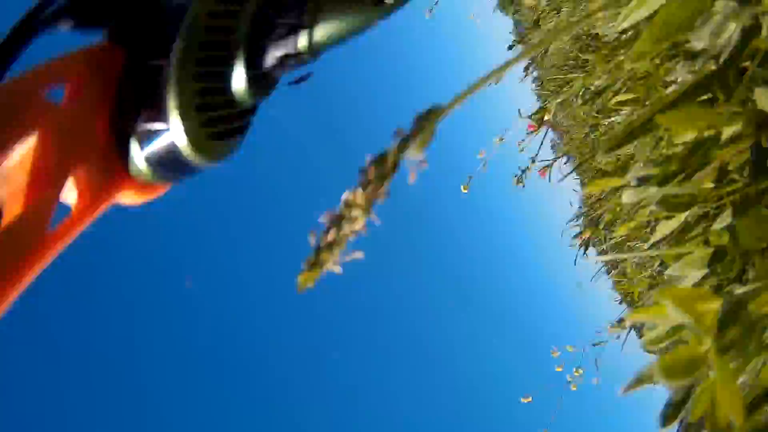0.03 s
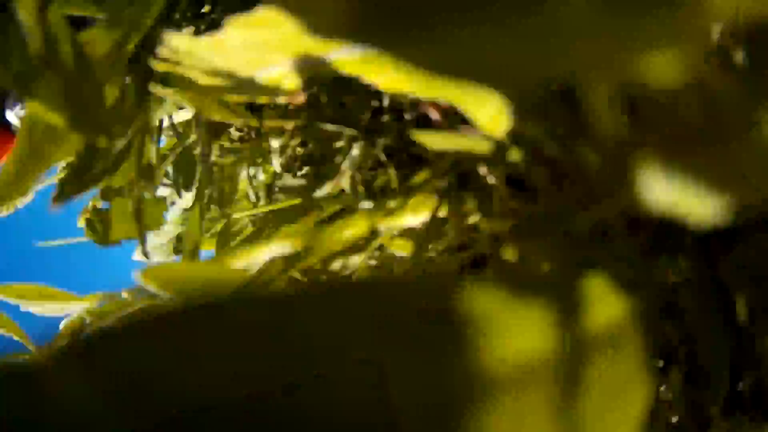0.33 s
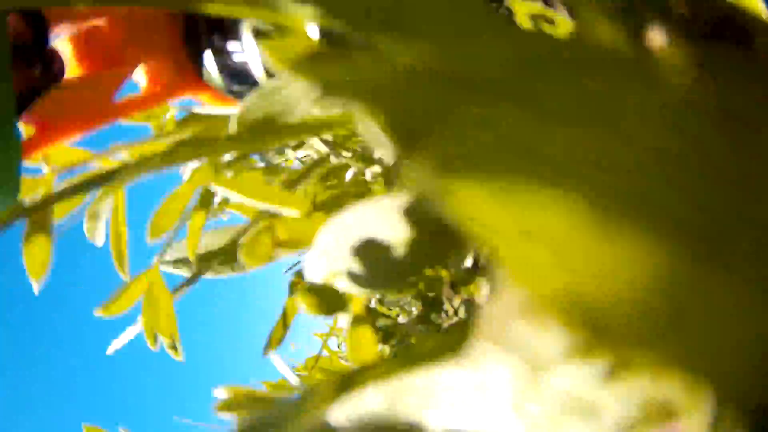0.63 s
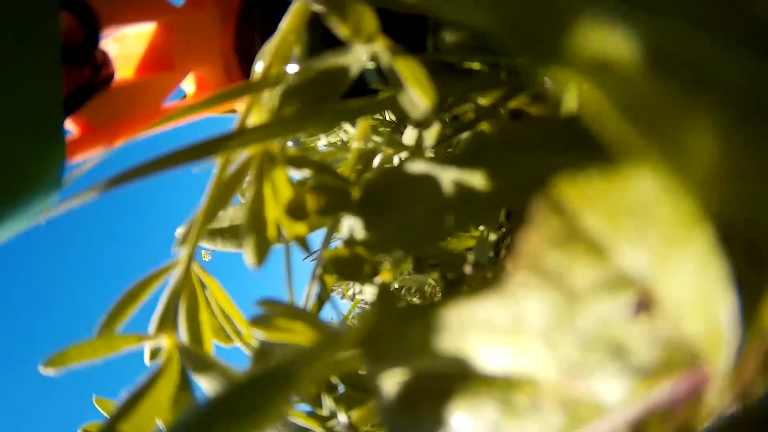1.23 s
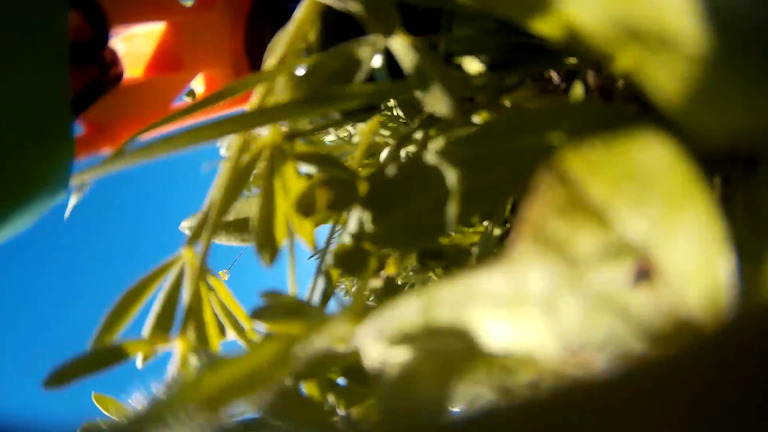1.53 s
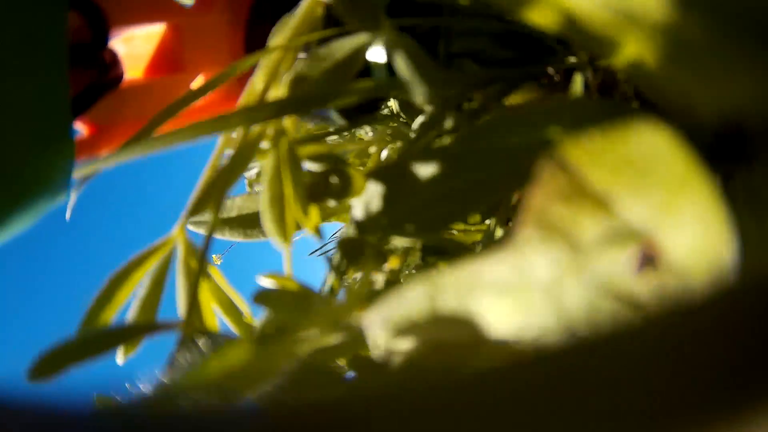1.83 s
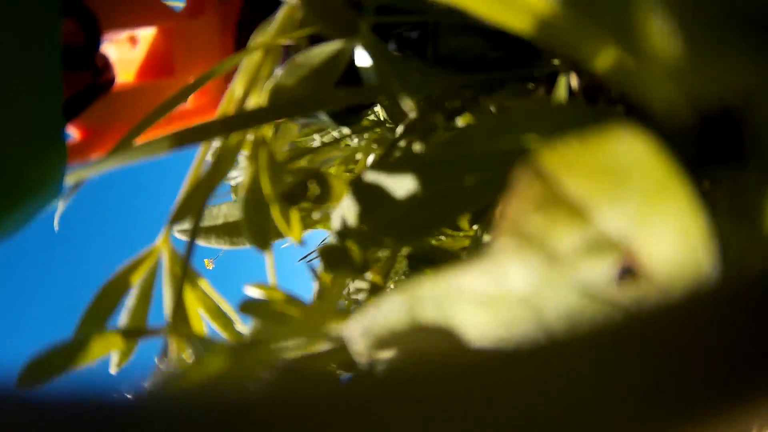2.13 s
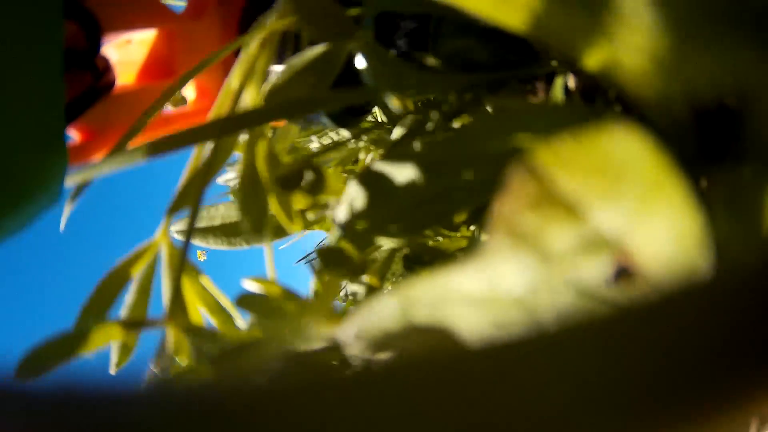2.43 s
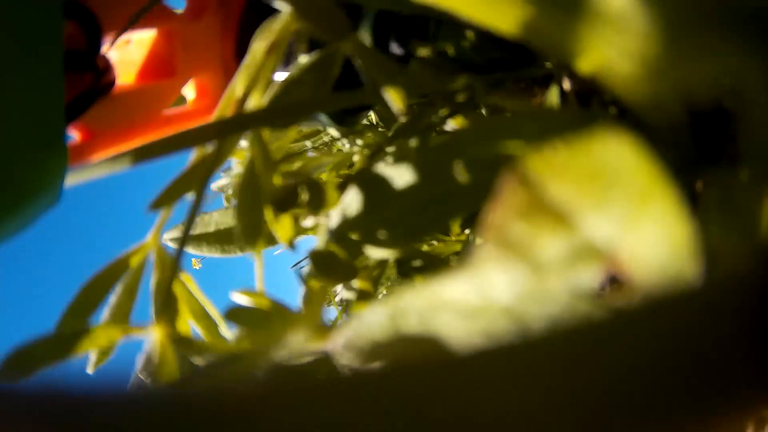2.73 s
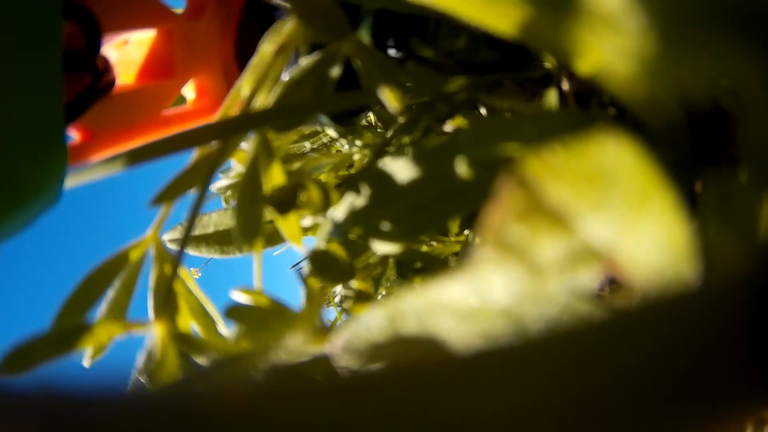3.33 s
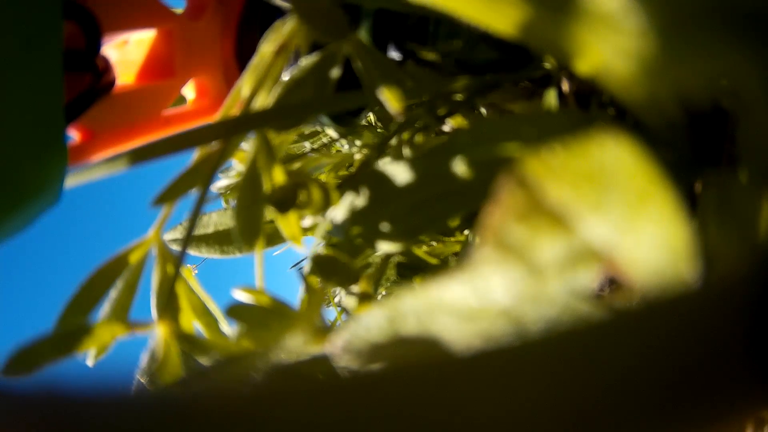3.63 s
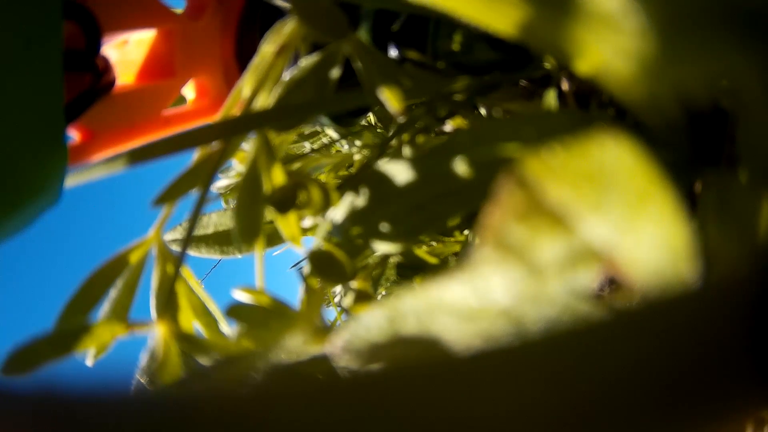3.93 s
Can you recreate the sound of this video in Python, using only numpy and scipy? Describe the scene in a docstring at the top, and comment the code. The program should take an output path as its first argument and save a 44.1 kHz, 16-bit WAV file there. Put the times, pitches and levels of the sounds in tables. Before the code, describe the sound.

A small drone whines and buzzes harshly as it crashes into a bush, heard from on board. Twigs snap, the blades shred leaves and slap a branch repeatedly, then the rotors wind down and tick to a stop.

```python
"""A small quadcopter ploughs into a bush, heard from the camera on its own frame.
The motors whine at full throttle as twigs snap and the frame crashes in; the knocks overload the mic.
The blades shred leaves and, from 1.25 s, slap a swaying branch that makes the motors waver.
At about 2.7 s the power is cut: the rotors coast down, whistling and rattling, and tick to a stop."""
import sys
import numpy as np
from scipy import signal
from scipy.fft import rfft, irfft, next_fast_len
from scipy.io import wavfile
from scipy.ndimage import uniform_filter1d, map_coordinates

SR = 44100
rng = np.random.default_rng(int(sys.argv[2]) if len(sys.argv) > 2 else 0)


def unload_wav(signal):
    """Save mono or channel-first audio to the path in sys.argv[1] as 16-bit WAV at rate SR, clipped to [-1, 1]."""
    wavfile.write(
        sys.argv[1],
        SR,
        np.round(np.clip(np.atleast_2d(signal).T, -1, 1) * 32767).astype(np.int16),
    )


N = 176400
T = np.arange(N) / SR
POWER_CUT_S = 2.725

# Shaft speeds of three motors. Each row: time in seconds, speed in Hz.
FAST_SPEED = [(0, 411), (.3, 412), (.34, 404), (.37, 413), (.5, 414), (.56, 406), (.62, 413), (.73, 402),
              (.83, 410), (1.2, 412), (2.55, 412), (2.7, 397), (2.8, 372), (2.9, 333), (3.04, 272),
              (3.21, 208), (3.43, 133), (3.6, 82), (3.75, 43), (3.9, 8)]
SLOW_SPEED = [(0, 255), (.33, 190), (.5, 278), (.66, 329), (.8, 324), (1, 323), (1.13, 337), (1.2, 353),
              (1.35, 369), (2.62, 369), (2.72, 335), (2.9, 260), (3.1, 187), (3.3, 124), (3.5, 68),
              (3.74, 5)]
THIRD_SPEED = [(0, 290), (.62, 360), (1.1, 358), (1.3, 379), (2.62, 379), (2.9, 290), (3.2, 178), (3.8, 5)]
# Partials of the buzz and of the coasting rotors. Each row: multiple of shaft speed, level in dB.
FAST_PARTIALS = [(1, 1.5), (3, -1.5), (4, -7.5), (9, -9.5), (10, -3.5)]
SLOW_PARTIALS = [(1, 0.5), (2, -1), (3, -6), (4, -9.5)]
THIRD_PARTIALS = [(2, -6.5), (4, -3.5), (20, -6.5)]
FAST_COAST_PARTIALS = [(10, -1), (26, -8), (28, -7.5), (42, -11), (84, 0)]
SLOW_COAST_PARTIALS = [(8, -2), (13, -0.5), (14, -1), (28, -2.5), (49, -4), (84, -5)]
# Fader moves for the pitched layers. Each row: time in seconds, level in dB.
FAST_BUZZ_DB = [(0, -40), (.15, -28), (.3, -24), (.55, -22), (1.3, -20), (1.5, -23), (2.65, -22.5),
                (2.9, -27), (3.1, -35), (3.32, -29), (3.55, -41.5), (3.9, -72)]
SLOW_BUZZ_DB = [(0, -41.5), (.45, -35.5), (.65, -23.5), (1.1, -26.5), (1.3, -24.5), (2.65, -26), (2.8, -24),
                (3.1, -32.5), (3.4, -42.5), (3.7, -55)]
THIRD_BUZZ_DB = [(0, -80), (1.1, -42), (1.35, -25), (2.6, -27), (2.8, -43), (3.8, -77.5)]
FAST_WHINE_DB = [(0, -32), (.06, -20.5), (.1, -31), (.2, -30), (.28, -19), (.6, -19.5), (.8, -26),
                 (1.3, -26), (2.6, -24.5), (2.9, -21.5), (3.15, -19), (3.3, -36.5), (3.6, -62), (3.9, -70)]
SLOW_WHINE_DB = [(0, -42), (1.1, -37), (1.2, -28), (1.3, -21.5), (1.45, -29), (2.6, -27.5), (2.85, -37),
                 (3.7, -70)]
SWITCHING_DB = [(0, -41), (.6, -34), (1.3, -27.5), (2.1, -25), (2.7, -25.5)]
BLADE_DB = [(0, -41), (.5, -31), (.6, -39), (2.7, -40), (3.6, -72.5)]
COAST_DB = [(2.6, -52), (2.85, -43), (3.2, -34), (3.45, -33.5), (3.68, -39.5), (3.77, -44), (3.87, -62)]
# The fourth motor's whine. Each row: time in seconds, pitch in Hz, level in dB.
FOURTH_WHINE = [(1.05, 2620, -60), (1.23, 2756, -29), (1.345, 2840, -22.5), (1.38, 2876, -35),
                (2.6, 2872, -40), (2.8, 2410, -77)]
# Fader moves for the noisy layers. Each row: time in seconds, level in dB.
RASP_LOW_DB = [(0, -39), (.3, -27), (.52, -38), (.64, -24.5), (.8, -27.5), (1.3, -29), (2.6, -36),
               (3, -29.5), (3.4, -44.5), (3.7, -44), (3.9, -59)]
RASP_MID_DB = [(0, -34), (.05, -34), (.11, -20), (.33, -14.5), (.5, -21.5), (.7, -18.5), (1.33, -20.5),
               (1.42, -21.5), (2.3, -20.5), (2.7, -21), (3.2, -22.5), (3.5, -30.5), (3.68, -32), (3.8, -43),
               (3.87, -45), (3.93, -71.5)]
RASP_HIGH_DB = [(0, -36), (.05, -31), (.12, -26.5), (.25, -26.5), (.35, -20), (.5, -25.5), (.9, -26),
                (1.35, -27.5), (1.45, -28.5), (2.6, -29), (3, -33), (3.4, -34.5), (3.7, -44.5), (3.87, -57),
                (3.93, -72)]
FIZZ_DB = [(0, -49), (.4, -38), (.95, -33), (1.4, -54), (2.6, -45), (3.3, -39), (3.9, -65.5)]
BEARING_DB = [(2.9, -63), (3.2, -38), (3.42, -38), (3.5, -37), (3.63, -30.5), (3.76, -44.5), (3.87, -44),
              (3.92, -80)]
# Rasp that repeats with each turn. Each row: time in seconds, level in dB against the random part.
REPEAT_DB = [(0, -8), (2.6, -5), (2.9, 1), (3.25, 2), (3.55, -6)]
# Cue lists for the hits. Each row: start in seconds, level in dB.
BRANCH_SLAPS = [(1.25, -14), (1.362, -1.5), (1.497, -3), (1.653, -3.5), (1.819, -6.5), (2.02, -13.5),
                (2.17, -14), (2.329, -12.5), (2.485, -8.5), (2.647, -8.5)]
TWIG_SNAPS = [(0.0137, -3), (.071, -11), (0.206, 2), (0.282, -10.5), (0.379, 2), (0.391, -11.5), (.466, -7),
              (.809, -4), (.824, 1.5), (0.935, -6)]
STEM_BUMPS = [(0.422, -15.5), (0.934, -19.5)]
LAST_TICKS = [(3.656, -22), (3.69, -25.5), (3.729, -24), (3.752, -20.5), (3.777, -21), (3.807, -25),
              (3.847, -31.5)]
# How the hits ring. Each row: pitch in Hz, level in dB, seconds to fall by 60 dB.
FRAME_MODES = [(271, -9.5, 0.022), (708, -5, 0.017), (1306, 5, 0.0046), (1516, 3, 0.018), (1745, 0, 0.0089),
               (4700, -21, 0.0081)]
BUMP_MODES = [(103, -16, 0.082), (162, -6, 0.017), (224, 6, 0.014)]
TICK_MODES = [(1070, -8, 0.031), (1700, -6, 0.06), (1850, -5.5, 0.026), (2570, -7.5, 0.021),
              (6900, -22, .03)]
# Resonances of the arms and frame, then each layer's EQ. Each row: frequency in Hz, gain in dB.
ARM_EQ = [(40, -26), (130, -3.5), (410, -2), (490, 1), (640, 0), (730, -3), (1480, 0.5), (1630, 3.5),
          (1800, -1), (6800, -8), (7450, 2), (7900, -10.5)]
FRAME_EQ = [(250, -17), (500, -2.5), (1000, -13), (1350, -5), (1600, 3), (2200, -4.5), (3100, 3),
            (5000, 5.5), (6100, -5.5), (7200, 7), (8500, -14), (12200, -5.5), (15000, -27)]
RASP_LOW_EQ = [(25, -32), (80, -10), (240, -7), (420, -3), (650, 2), (900, 3.5), (1300, -18.5),
               (3000, -61.5)]
RASP_MID_EQ = [(300, -49.5), (800, -18.5), (1200, -3.5), (1620, 4.5), (1950, -1), (2500, -6.5), (3300, -4),
               (3900, -5), (5200, -2.5), (5900, -18), (7500, -41)]
RASP_HIGH_EQ = [(3000, -19), (5500, -2), (6400, -0.5), (7200, 4), (8200, -3), (9800, 2), (11000, -11),
                (13000, -11.5), (15800, -30.5)]
FIZZ_EQ = [(7000, -29), (10500, 0.5), (12200, 4), (15800, -10)]
SLAP_EQ = [(140, -14.5), (235, -1), (5000, 0), (15000, -14.5)]
SNAP_EQ = [(200, -2.5), (1500, 7), (4500, 6), (7000, 6), (11500, 4.5), (16000, -18)]
AIR_EQ = [(110, -0.5), (250, -1), (700, -25), (1700, -21.5), (15000, -56)]


def amp(db):
    return 10 ** (np.asarray(db) / 20)


def unit(x):
    return x / np.sqrt(np.mean(x ** 2) + 1e-20)


def curve(rows):
    return np.interp(T, *np.transpose(rows))


def angle(hz):
    return 2 * np.pi * np.cumsum(hz) / SR


def wobble(rate):
    """Smooth random drift with `rate` knots a second."""
    coarse = T[::10]
    knots = rng.standard_normal(int(N * rate / SR) + 4)
    return np.interp(T, coarse, map_coordinates(knots, [coarse * rate]))


def filtered(x, response):
    size = next_fast_len(N + 8192)
    return irfft(rfft(x, size) * response(np.fft.rfftfreq(size, 1 / SR)), size)[..., :N]


def eq(x, points):
    freqs, db = np.transpose(points)
    return filtered(x, lambda hz: amp(np.interp(np.log(hz + 1), np.log(freqs), db)))


def add(track, start_s, sound):
    part = track[int(start_s * SR):][:len(sound)]
    part += sound[:len(part)]


def tone(shaft, order, rough):
    """One multiple of the shaft speed, with a rough edge."""
    phase = order * shaft + rng.uniform(0, 2 * np.pi)
    return unit((1 + rough * wobble(70)) * np.cos(phase) + rough * wobble(110) * np.sin(phase))


def shafts():
    """Shaft angles: the controller hunts; as the branch sways, one rotor slows and another speeds up."""
    phase, caught = branch_sway()
    powered = np.clip((POWER_CUT_S - T) * 10, .15, 1)
    hunting = 0.0061 * np.sin(angle(24 + 4 * wobble(2.8))) + 0.00186 * wobble(20)
    fast = curve(FAST_SPEED) * (1 + powered * hunting + 0.0039 * caught * np.sin(phase))
    slow = curve(SLOW_SPEED) * (1 + 0.0016 * wobble(25) - 0.0092 * caught * np.cos(phase))
    third = curve(THIRD_SPEED) * (1 + .003 * wobble(14) + 0.0187 * caught * np.cos(phase))
    return angle(fast), angle(slow), angle(third)


def motor_buzz(shaft, partials, fader, rough):
    """An unbalanced rotor and its blades buzz; the higher partials are rougher."""
    return amp(curve(fader)) * sum(amp(db) * tone(shaft, k, rough * np.sqrt(k)) for k, db in partials)


def magnetic_whine(fast, slow):
    """The magnets of three motors sing; the slow motor swells and dips with the branch."""
    phase, caught = branch_sway()
    swell_db = 5 * caught * np.tanh(2 * np.cos(phase) + 1)
    whine = amp(curve(FAST_WHINE_DB) + 0.9 * wobble(40)) * tone(fast, order=14, rough=0.096)
    whine += amp(curve(SLOW_WHINE_DB) + swell_db) * tone(slow, order=13, rough=.1)
    times, hz, db = np.transpose(FOURTH_WHINE)
    return whine + amp(np.interp(T, times, db)) * tone(angle(np.interp(T, times, hz)), 1, rough=.3)


def switching_tone(slow, pitch_hz=9125):
    """The speed controller's thin whistle: it pushes after each slap and dies with the power."""
    phase, caught = branch_sway()
    whistle = unit(np.sin(2 * np.pi * pitch_hz * T) * (1 + 0.36 * np.cos(slow) + 0.37 * np.cos(2 * slow)))
    surge = np.tanh(4 * (np.sin(phase - .5) + .5))
    level_db = curve(SWITCHING_DB) + 4 * caught * (surge - 1) + 2.3 * wobble(16)
    return whistle * amp(level_db) * (T < POWER_CUT_S)


def coasting(fast, slow, shudder_rad=.02, flare_db=3.5):
    """Tones of the shuddering, unpowered rotors flare as they fall through the frame's resonances."""
    whistles = np.zeros(N)
    for shaft, partials in ((fast, FAST_COAST_PARTIALS), (slow, SLOW_COAST_PARTIALS)):
        shaky = shaft + shudder_rad * wobble(160)
        for order, db in partials:
            level = amp(db + flare_db * np.tanh(wobble(18)))
            below_nyquist = order * np.gradient(shaft) < np.pi
            whistles += level * tone(shaky, order, rough=0.41) * below_nyquist
    return amp(curve(COAST_DB)) * eq(whistles, FRAME_EQ)


def scrape(rotors, depth, grit_db):
    """Noise that swells once a turn of each rotor, in uneven grains."""
    noise = np.zeros(N)
    for shaft in rotors:
        swell = np.exp(depth * np.cos(shaft + rng.uniform(0, 2 * np.pi)))
        noise += swell * amp(grit_db * wobble(900)) * rng.standard_normal(N)
    return unit(noise)


def grind(shaft, count=50):
    """The rotor runs over the same rough track every turn: a dense stack of harmonics."""
    harmonics = np.exp(2j * np.pi * rng.random(count)) * amp(4.5 * rng.standard_normal(count))
    track = irfft(np.r_[0, harmonics], 2048)
    turns = (shaft + 0.023 * wobble(120)) / (2 * np.pi)
    return unit(np.interp(turns % 1, np.linspace(0, 1, len(track)), track))


def rasp(rotors):
    """Blades shred leaves and bearings grind through the frame, in three flickering bands."""
    repeat = amp(curve(REPEAT_DB))
    grinding = unit(sum(grind(shaft) * amp(1.1 * wobble(25.3)) for shaft in rotors))

    def with_grind(noise):
        return (noise + repeat * grinding) / np.sqrt(1 + repeat ** 2)

    low = unit(eq(scrape(rotors, depth=0.43, grit_db=6), RASP_LOW_EQ))
    low *= amp(curve(RASP_LOW_DB) + 2.4 * wobble(30.03))
    mid = unit(eq(with_grind(scrape(rotors, depth=0.68, grit_db=2)), RASP_MID_EQ))
    mid *= amp(curve(RASP_MID_DB) + 1.3 * wobble(40))
    high = unit(eq(with_grind(scrape(rotors, depth=0.86, grit_db=5)), RASP_HIGH_EQ))
    high *= amp(curve(RASP_HIGH_DB) + 1.5 * wobble(30))
    return low + mid + high


def branch_sway():
    """The branch's phase, one cycle from slap to slap, and a soft gate while the craft hangs in it."""
    times = np.array([start for start, _ in BRANCH_SLAPS[2:]])
    phase = 2 * np.pi * np.interp(T, times, np.arange(len(times)))
    caught = uniform_filter1d(1. * ((T > times[0]) & (T < times[-1])), SR // 20)
    return phase, caught


def knock(modes, crack_db):
    """One blow: damped modes, tuned a little differently each time, and a brief crack."""
    t = T[:SR // 10]
    body = np.zeros(len(t))
    for hz, db, t60 in modes:
        decay = amp(db + rng.normal(0, 0.79) - 60 * t / t60)
        body += decay * np.sin(2 * np.pi * hz * (1 + 0.074 * rng.normal()) * t)
    return body + amp(crack_db - 60 * t / 0.026) * rng.standard_normal(len(t))


def crash(start_s=.206, dull_hz=876):
    """The whole frame hits the bush: one hard blow, dulled by the soft contact."""
    blow = np.zeros(N)
    add(blow, start_s, amp(8) * knock(FRAME_MODES, crack_db=-7.5))
    return filtered(blow, lambda hz: 1 / (1 + .5j * hz / dull_hz - (hz / dull_hz) ** 2))


def contacts(blade_gap_s=.0028):
    """The frame bumps stems, three blades in a row slap the branch, and a rotor ticks to rest."""
    blows, bumps = np.zeros(N), np.zeros(N)
    for start, db in BRANCH_SLAPS:
        for blade in range(3):
            onset = start + blade * blade_gap_s * rng.uniform(.8, 1.3)
            add(blows, onset, (-1) ** blade * amp(db) * knock(FRAME_MODES, crack_db=0.5))
    for start, db in STEM_BUMPS:
        add(bumps, start, amp(db) * knock(BUMP_MODES, crack_db=-2))
    for start, db in LAST_TICKS:
        add(blows, start, amp(db) * knock(TICK_MODES, crack_db=-18))
    return eq(blows, SLAP_EQ) + bumps


def twigs(t60=0.0091):
    """Each twig breaks with a short, bright burst of noise."""
    snaps, t = np.zeros(N), T[:SR // 20]
    for start, db in TWIG_SNAPS:
        add(snaps, start, amp(db - 60 * t / t60) * rng.standard_normal(len(t)))
    return eq(snaps, SNAP_EQ)


def dry_bearing(shaft, ring_hz=6980, width_hz=145):
    """A dry bearing scrapes and rings as its rotor winds down."""
    friction = scrape([shaft], depth=0.95, grit_db=8)
    ringing = filtered(friction, lambda hz: (1 + 1j * (hz - ring_hz) / width_hz) ** -2)
    return unit(ringing) * amp(curve(BEARING_DB) + 4 * wobble(35))


def fizz(rotors):
    """A fine sizzle on top of the rasp, pulsing with the rotors."""
    return unit(eq(scrape(rotors, depth=.8, grit_db=3), FIZZ_EQ)) * amp(curve(FIZZ_DB))


def blade_tone(shaft):
    """A faint, rough note from one rotor's blades."""
    return amp(curve(BLADE_DB)) * tone(shaft, order=1.7, rough=0.25)


def air():
    """A quiet, steady bed of dark noise."""
    return amp(-50) * unit(eq(rng.standard_normal(N), AIR_EQ))


def scene():
    """Everything reaches one microphone through the frame."""
    rotors = fast, slow, third = shafts()
    buzz = motor_buzz(fast, FAST_PARTIALS, FAST_BUZZ_DB, rough=0.13)
    buzz += motor_buzz(slow, SLOW_PARTIALS, SLOW_BUZZ_DB, rough=0.22)
    buzz += motor_buzz(third, THIRD_PARTIALS, THIRD_BUZZ_DB, rough=0.22)
    mono = eq(buzz, ARM_EQ) + blade_tone(fast) + air()
    mono += magnetic_whine(fast, slow) + switching_tone(slow) + coasting(fast, slow)
    mono += rasp(rotors) + dry_bearing(fast) + fizz(rotors)
    mono += contacts() + twigs() + crash()
    return np.array([mono, mono])


def record(dry):
    """Overloads duck the gain for a moment and clip softly; the top is cut off."""
    threshold, release_s, max_duck_db, ceiling, top_hz = .7, .12, 4, .76, 15900
    overload = np.maximum(np.abs(dry[0]) - threshold, 0)
    duck = signal.lfilter([1 / SR], [1, -np.exp(-1 / (SR * release_s))], overload) * 1200
    ducked = dry * amp(-max_duck_db * np.tanh(duck / max_duck_db))
    clipped = ducked / (1 + np.abs(ducked / ceiling) ** 6) ** (1 / 6)
    return filtered(amp(-1) * clipped, lambda hz: hz < top_hz)


dry = scene()
out = record(dry)
unload_wav(out)
```